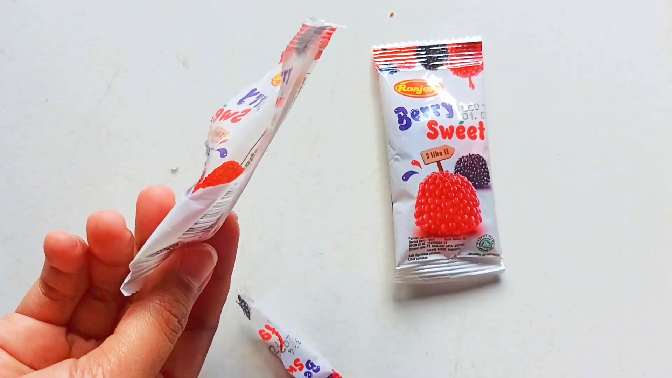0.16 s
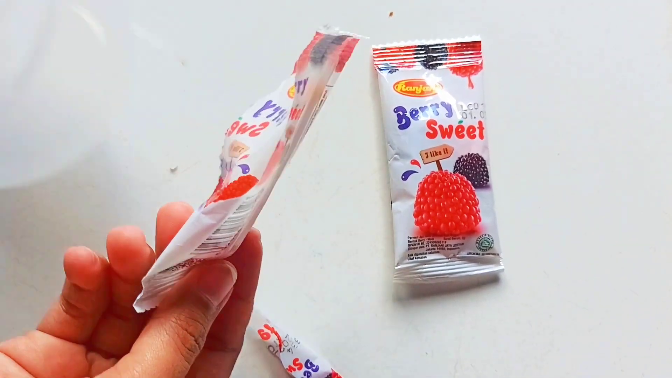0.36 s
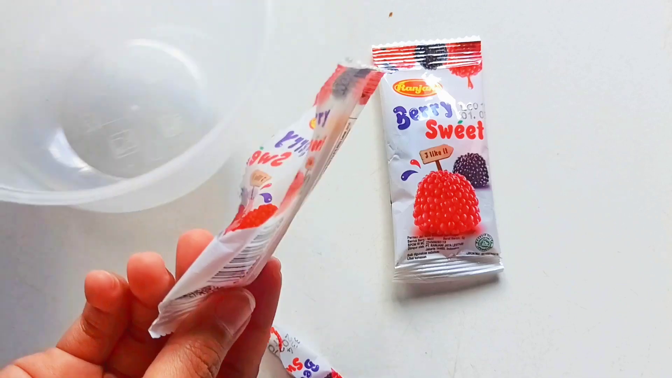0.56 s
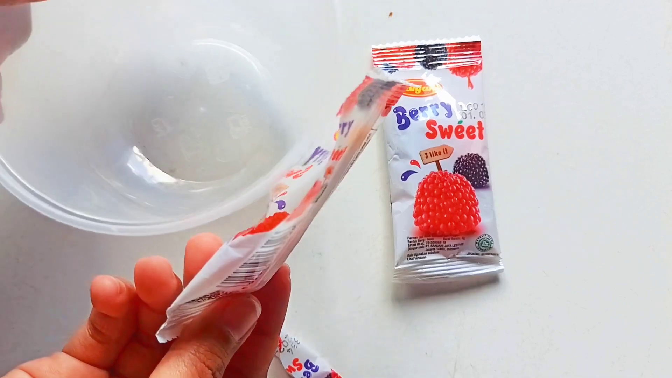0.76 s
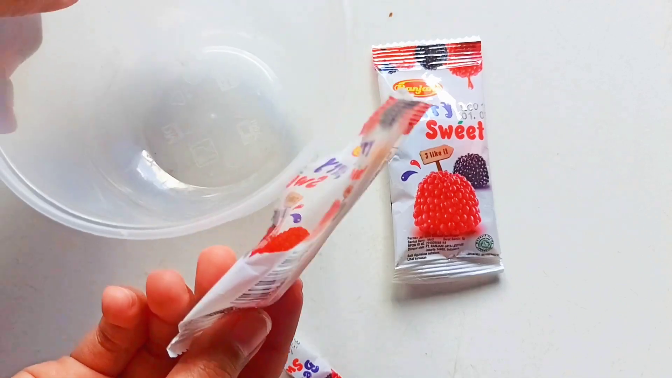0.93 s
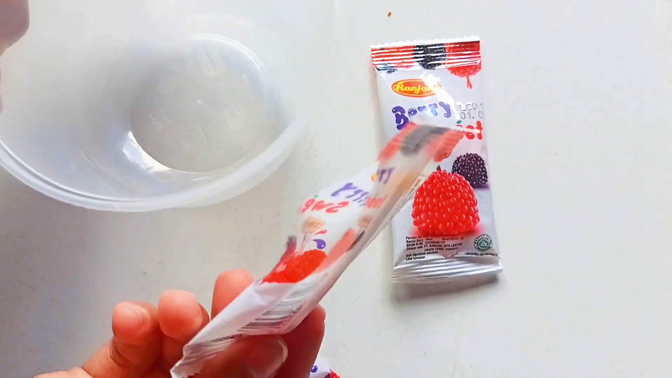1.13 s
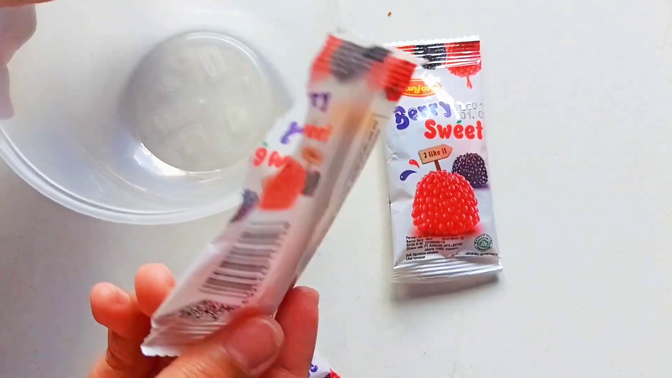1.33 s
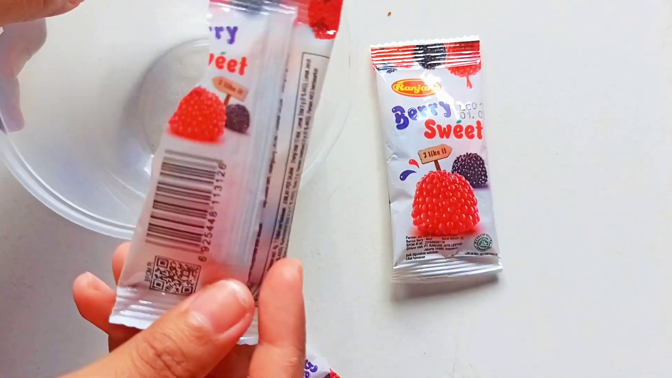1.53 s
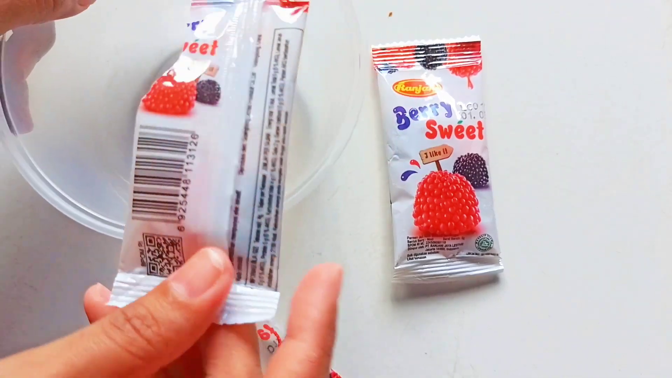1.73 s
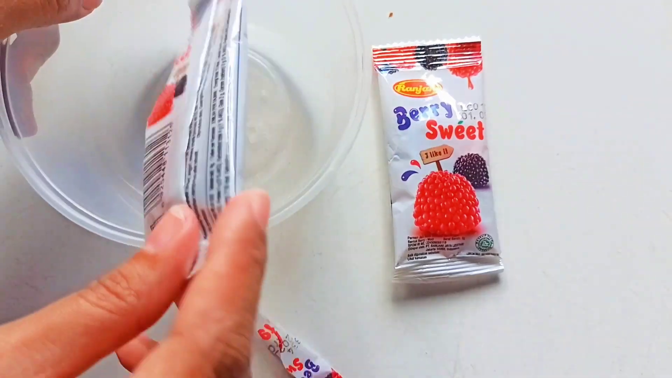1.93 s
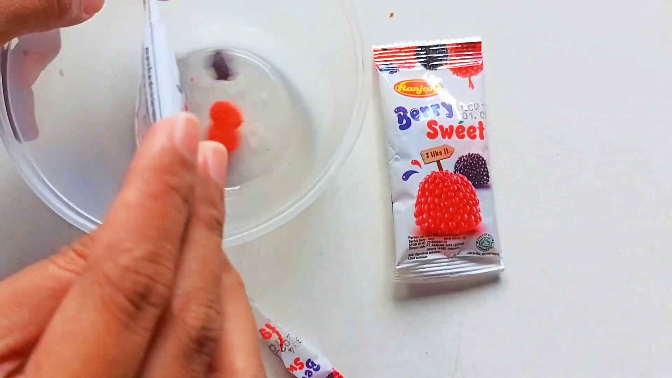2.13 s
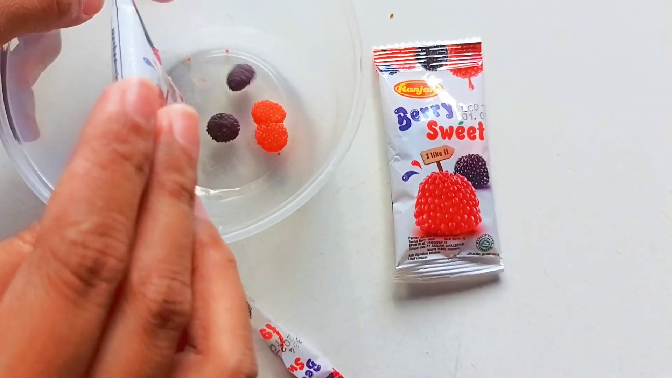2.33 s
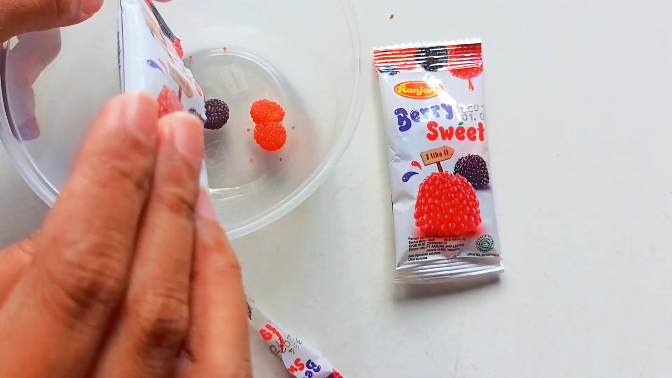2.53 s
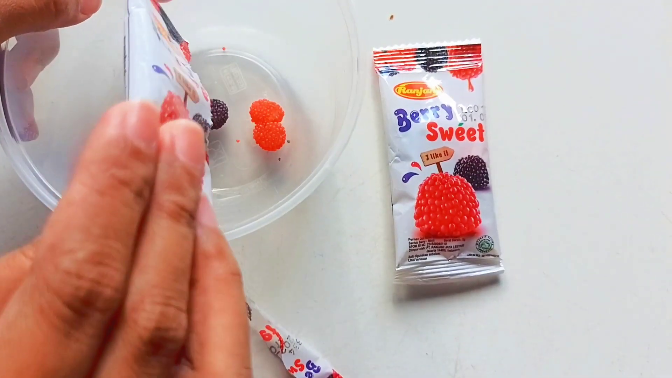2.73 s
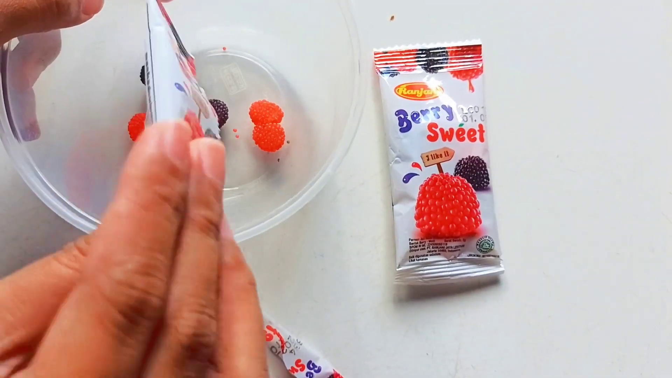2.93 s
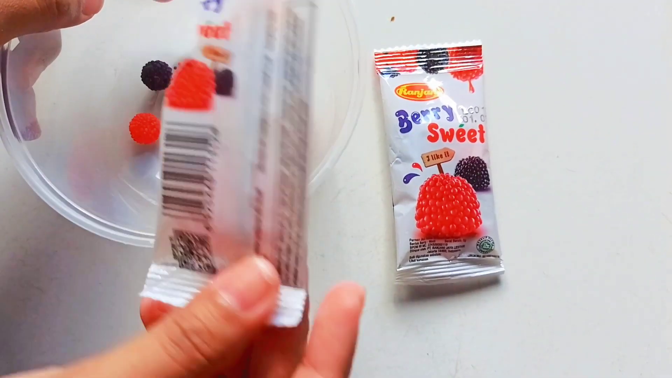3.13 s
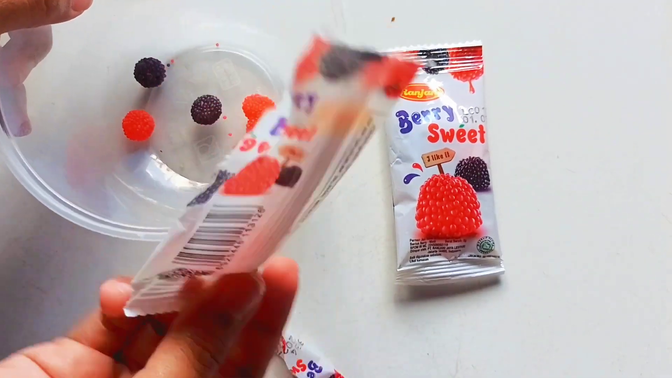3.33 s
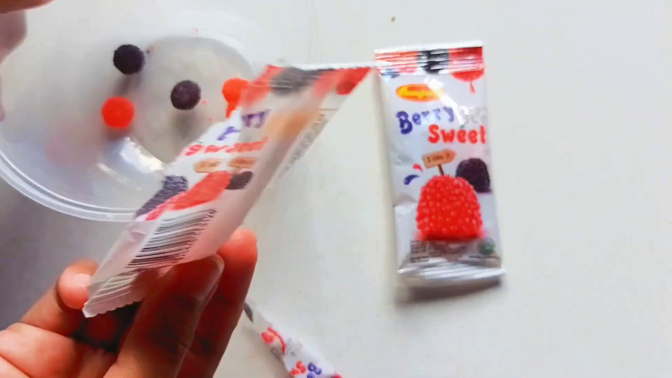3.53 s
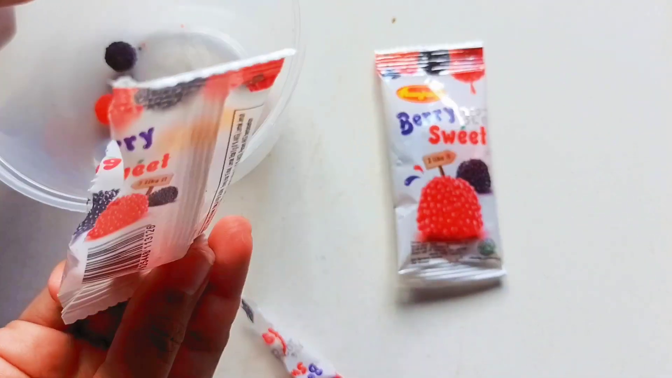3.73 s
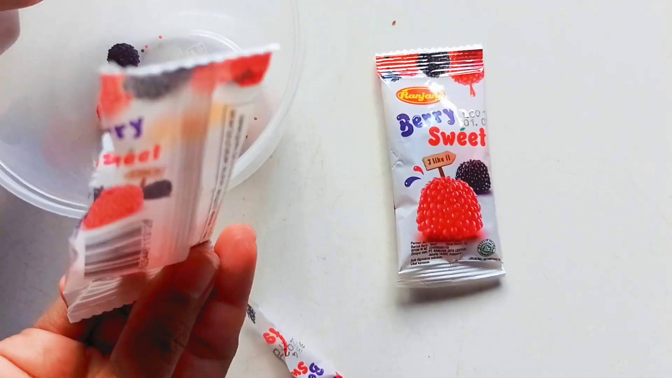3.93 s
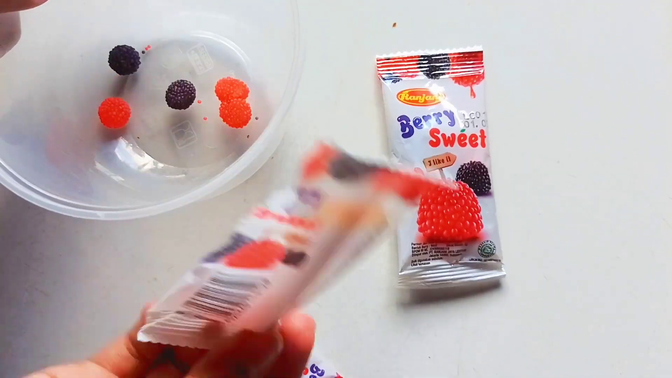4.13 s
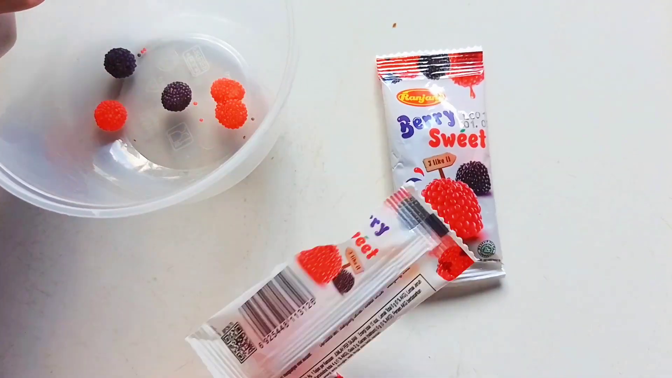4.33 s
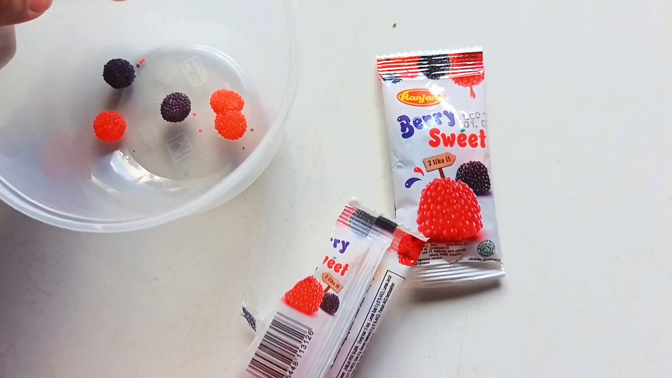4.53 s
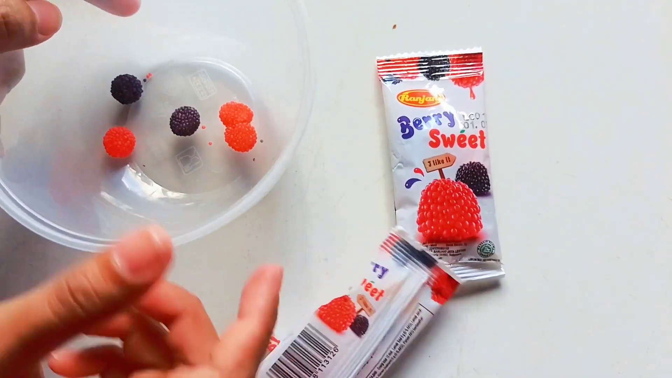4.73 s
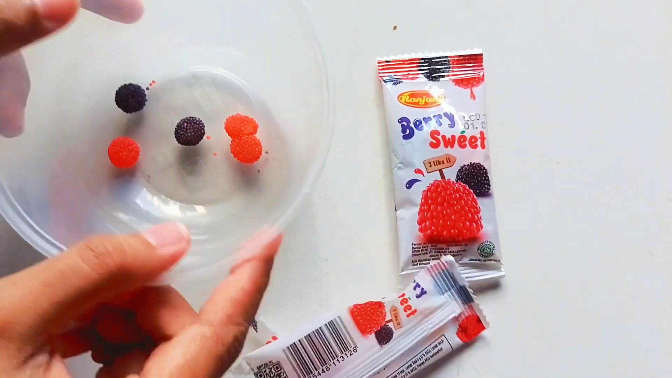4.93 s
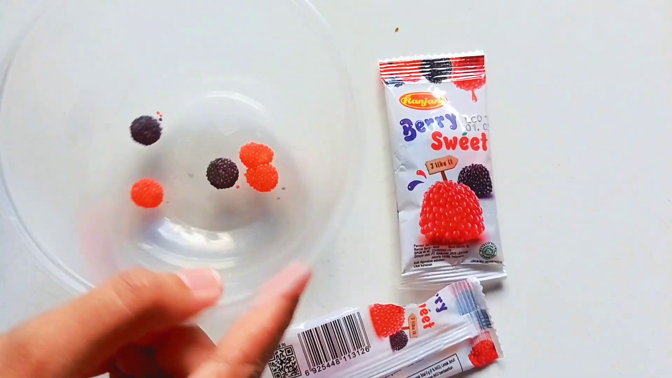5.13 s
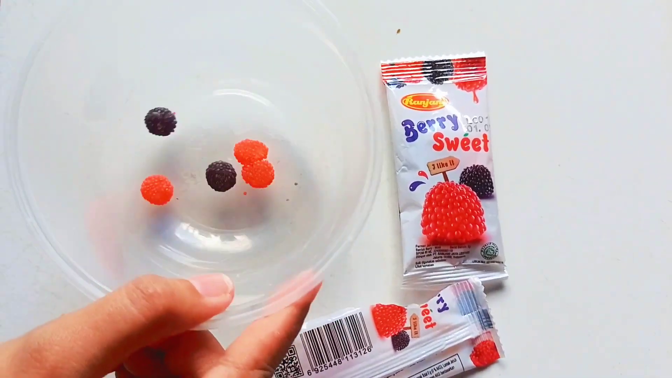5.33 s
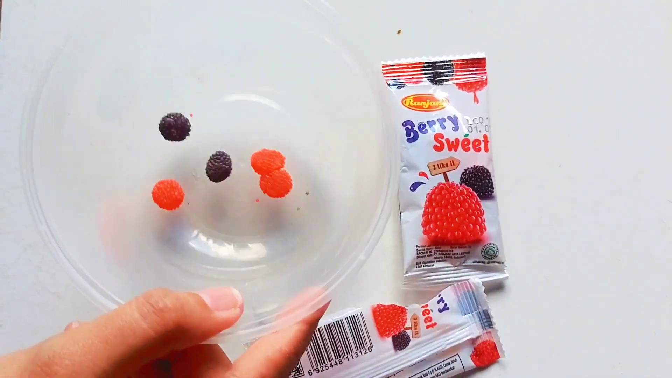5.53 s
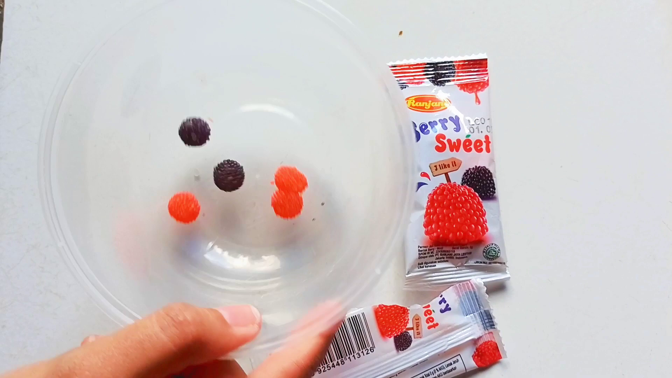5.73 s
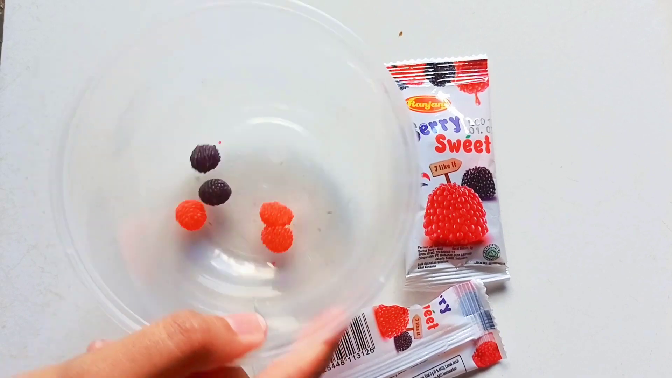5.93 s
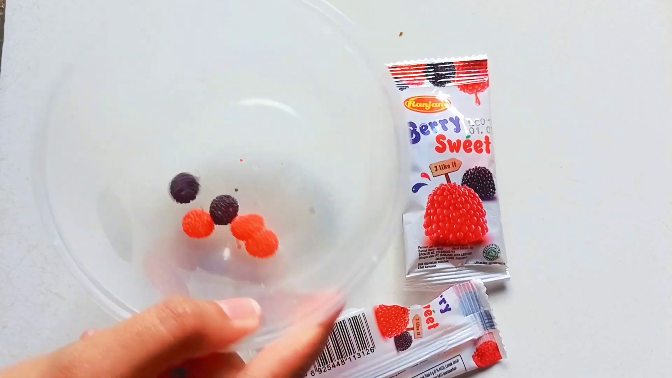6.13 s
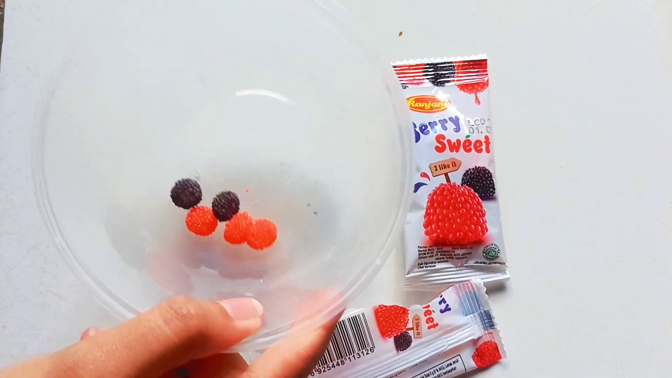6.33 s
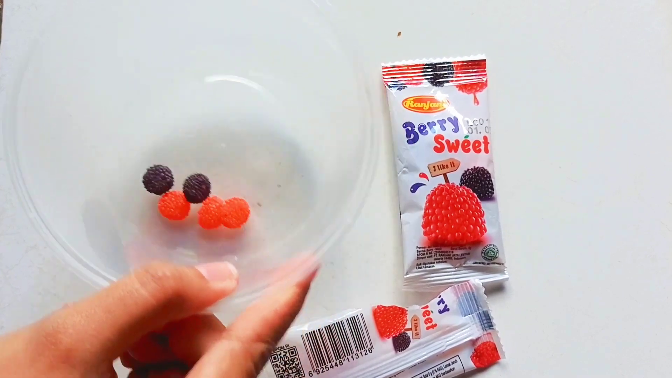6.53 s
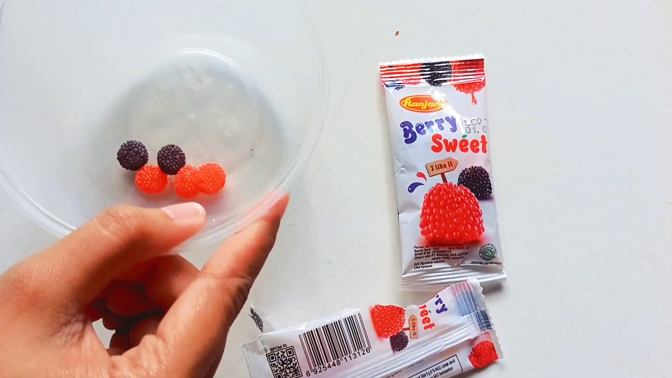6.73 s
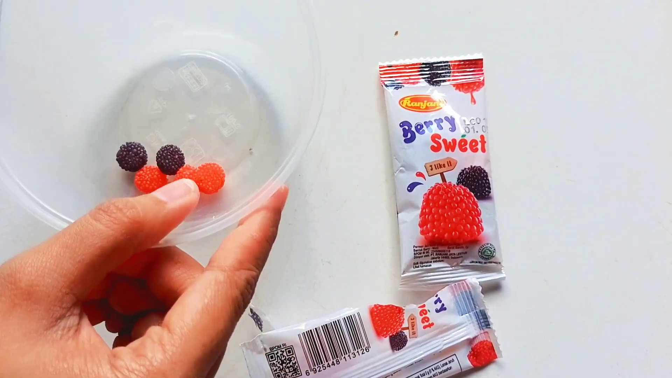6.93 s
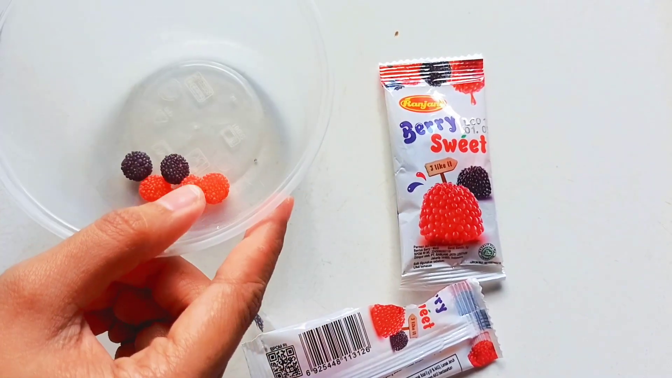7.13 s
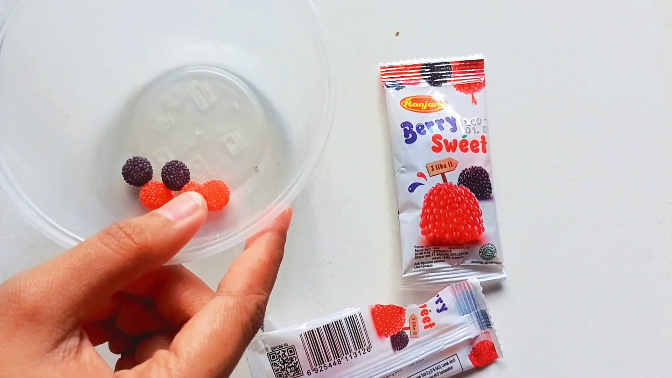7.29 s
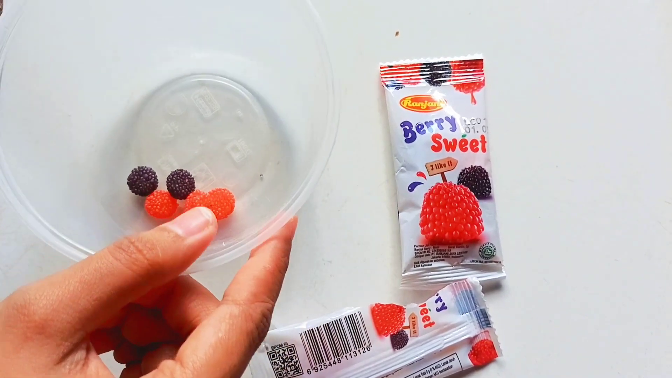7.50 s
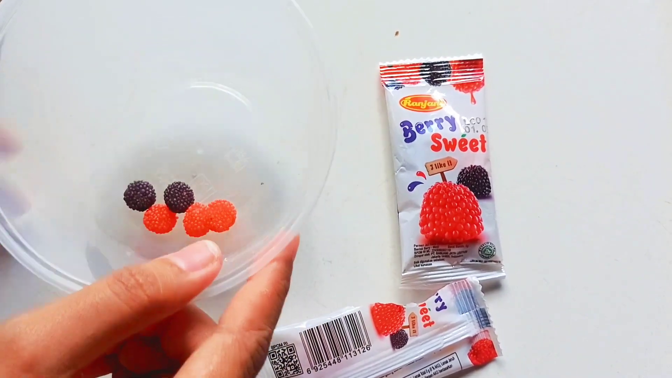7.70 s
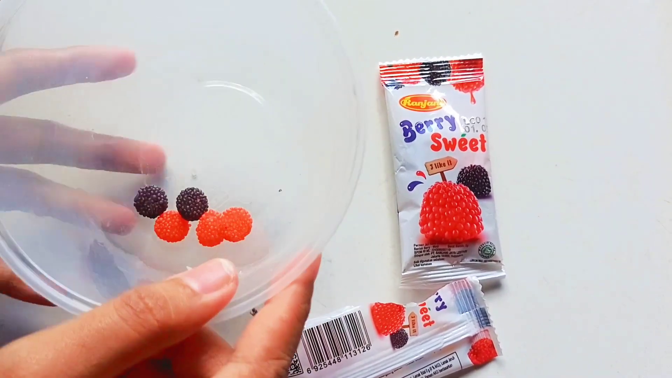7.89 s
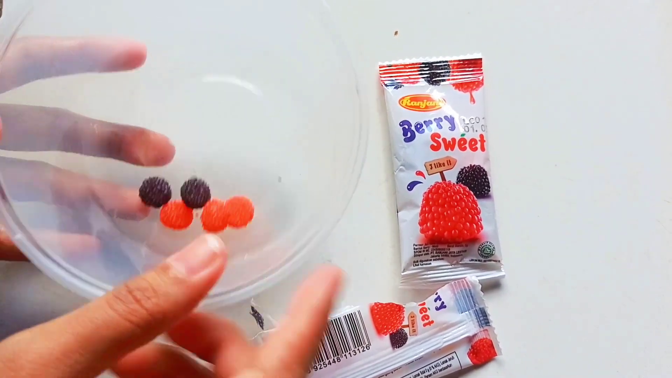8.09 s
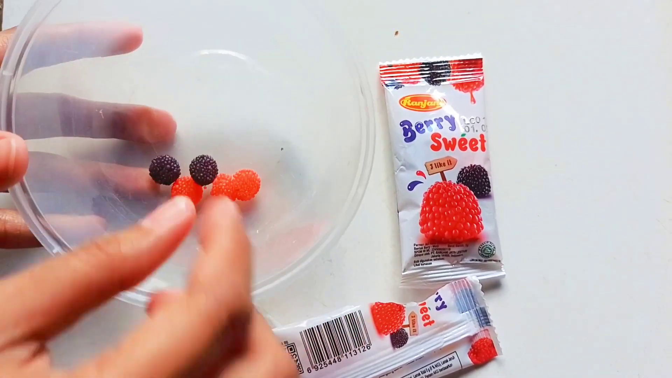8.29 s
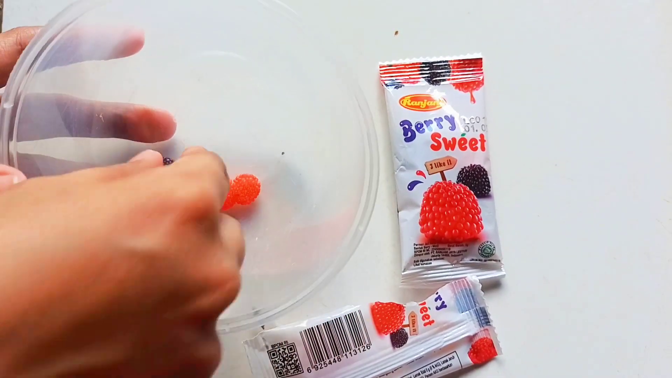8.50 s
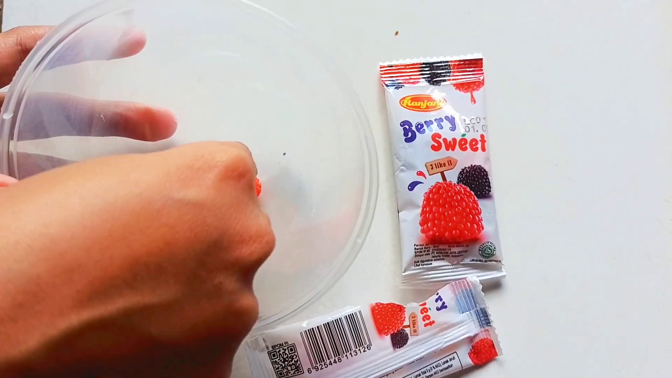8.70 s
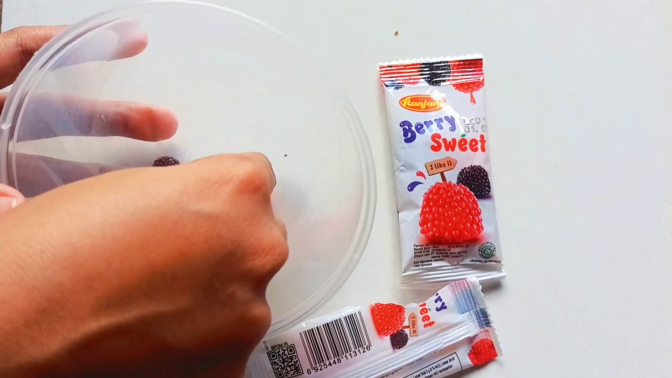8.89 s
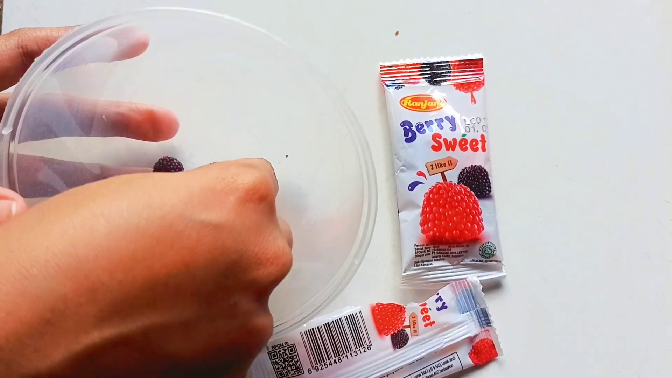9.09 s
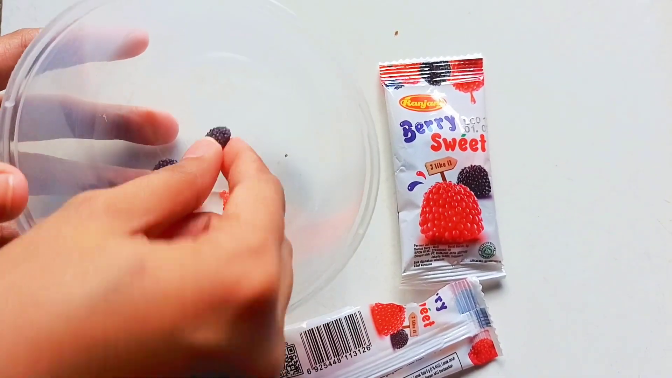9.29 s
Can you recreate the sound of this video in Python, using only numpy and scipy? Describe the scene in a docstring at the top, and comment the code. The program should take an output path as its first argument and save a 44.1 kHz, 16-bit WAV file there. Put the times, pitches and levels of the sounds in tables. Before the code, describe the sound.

Crisp wrapper clicks, a quick rattling pour of small sugared candies into a plastic bowl, faint crinkles, then a bumpy rolling and soft finger rustles.

```python
"""A thin plastic sachet crinkles in a hand: creases snap as coloured clicks.
From 2.1 s sugar-beaded gummy sweets pour into a light plastic bowl: knocks, patter and modal ring; they settle.
The sachet ticks faintly and is put down; from 4.9 s the bowl is tilted and the sweets roll on its side.
From 6.6 s fingers brush the rim: stick-slip noise and a few knocks; a dull swell and a lower hum pass.
Throughout: a small room's noise tail, hiss, low rumble and wavering hum."""
import sys
import numpy as np
from scipy import signal
from scipy.fft import rfft, irfft, next_fast_len
from scipy.io import wavfile
from scipy.ndimage import map_coordinates

SR = 44100
rng = np.random.default_rng(int(sys.argv[2]) if len(sys.argv) > 2 else 0)


def inscribe(sig):
    """Save sig as 16-bit PCM at rate SR to the path in sys.argv[1].

    A 1-D sig is mono; a 2-D sig holds one channel per row.
    Samples are clipped to [-1, 1] before scaling.
    """
    pcm = np.round(np.clip(np.atleast_2d(sig).T, -1, 1) * 32767)
    wavfile.write(sys.argv[1], SR, pcm.astype(np.int16))


N = 412335

# All levels are before the mix gains; spectra give shape only.
# Crease snaps: t/s, crack level/dB, body re crack/dB, treble re crack/dB, spot f/Hz
SNAPS = [(0.0472, -53, -31, 5, 4620), (0.0632, -44.5, -26, -2, 4830), (0.0804, -44.5, -7.5, -1.5, 2630),
         (0.7837, -48.5, -13, -6, 3730), (1.0448, -76, -2, 23, 3920), (1.0626, -53, -1, -1.5, 3330),
         (1.1053, -58, -3.5, 3, 3610), (1.1292, -40.5, -7.5, 2.5, 3700), (1.2884, -34.5, -8, -4.5, 4430),
         (1.3507, -57, -18, 6, 3810), (1.646, -44, -18, -6, 4200), (1.7634, -54, -21.5, 4.5, 3830),
         (1.9552, -41, -14, 5, 5300), (2.0218, -41, -7.5, 6, 4670), (2.9232, -43, -9, -2, 4190),
         (3.0348, -55, -28, -8, 3180), (3.1951, -56, -22, 3, 3780), (3.316, -57, -22.5, -3, 3040),
         (3.3983, -59, -21.5, 1.0, 4410), (3.4291, -53.5, -13, -4, 2970), (3.455, -48.5, -9, -10, 3930),
         (3.4737, -55.5, -5, -6, 4630), (3.6039, -53.5, -18, 12, 3780), (3.7261, -59, -13, 5, 4090),
         (3.8276, -60, -14, 1, 3900), (4.2085, -41.5, -14, -6, 3680), (4.2516, -66, -8, 9, 3100),
         (4.5009, -42, -11, -7.0, 3200), (4.5698, -44.5, -12.5, -11, 3830)]
# Spells of faint ticks: start t/s, end t/s, crack level/dB
HANDLING = [(2.944, 3.2, -58.5), (3.203, 3.46, -61), (3.478, 3.776, -57.5)]
# Crack spectrum of film and bowl side: f/Hz, level/dB
CREASE = [(400, -9.5), (1100, -27), (1800, -7), (2600, 0), (3500, 0.5), (4500, 0.5), (5800, 5.5),
          (8000, -18.5), (16000, -49)]
# Body spectrum of the flexing film: f/Hz, level/dB
FLEX = [(30, -17), (90, -31), (200, 8), (400, 0), (650, 1.5), (1000, -1.5), (1700, -6), (2500, -17),
        (5000, -61)]


def sachet():
    """Creases of the film buckle one at a time; handling sets off faint, shorter ones."""
    snaps = np.c_[SNAPS, np.full(len(SNAPS), 6)]  # spot peak, dB
    body, bright = clicks(snaps, CREASE, FLEX, t60=0.015, treble_t60=0.0094, body_t60=0.024,
                          spot_octaves=0.12)
    faint = np.vstack([scattered(start, end, db, body_db=-23, treble_db=1, scatter_db=2.5, count=9)
                       for start, end, db in HANDLING])
    tick_body, tick_bright = clicks(faint, CREASE, FLEX, t60=0.0075, treble_t60=0.0022, body_t60=0.012,
                                    spot_octaves=0.19)
    return amp(-4.0) * body + amp(-5.5) * bright + amp(-5.5) * (tick_body + tick_bright)


TILT_S = 4.9  # from here the sweets run on the bowl's side
# Sweets and fingertips on the bowl: t/s, crack level/dB, body re crack/dB, treble re crack/dB,
# spot f/Hz, spot peak/dB
KNOCKS = [(2.0643, -42.5, -0.5, -9, 2490, 10), (2.114, -44, -5.5, 0, 2470, 7),
          (2.1557, -25.5, -8.5, 0.5, 4150, 9.5), (2.173, -46, -6, 11, 7800, 8),
          (2.1872, -28.5, 2.5, 1, 4400, 9), (2.2152, -33.5, 1, -2, 4360, 2),
          (2.2286, -29.5, -5, 4, 3120, 9), (2.2499, -28, -1, -1.5, 3640, 8),
          (2.2938, -27, -5, -13, 4500, 14), (2.3063, -38, 0, 1, 3210, 3), (2.338, -34.5, 6, 4, 4600, 5),
          (2.3502, -28, -7.5, -9, 4540, 19), (2.3796, -40.5, -9, -2, 4350, 1),
          (2.3878, -43.5, -8, 2, 4430, 3), (2.4137, -38.5, -12, 7.5, 6470, 7),
          (2.4703, -42.5, -2, 1, 3680, 8), (2.4974, -45, -6, -18.5, 3900, 16),
          (2.5128, -42.5, -5, -7, 3715, 5), (2.6314, -39, 2, -2.5, 4700, 5),
          (2.6689, -35, -7.5, -2.5, 4300, 1), (2.74, -38.5, -4.5, 0.5, 4500, -7),
          (2.7541, -46, -9, -12, 3810, 5), (2.7688, -46, -7, -2, 3650, 3), (4.9406, -51, 5.5, -1, 3730, 8),
          (5.1143, -48.5, -1, 0.5, 6020, 15), (5.1613, -46, 0, -6, 3200, 9),
          (5.3351, -46, -2, -12, 3460, 10), (5.3583, -41.5, -2, -1, 4620, 10),
          (5.5292, -47, 7, -5, 2770, 10), (5.6875, -44.5, 4.5, -1, 4390, -4),
          (5.7607, -52, 3, -3, 2210, 19), (5.9091, -44, 2, -5, 4620, 14), (6.0225, -28, -1.5, -6, 2450, 15),
          (6.039, -39.5, 2.5, -10, 4040, 6), (6.083, -42, -12, -3, 4900, 7), (6.1115, -43, 4, -7, 2380, 8),
          (6.1615, -43.5, 13.5, 1.5, 5580, 6), (6.1954, -36.5, 5, -5, 2500, 16),
          (6.2131, -40.5, 3.5, -2, 2570, 9), (6.2268, -39, 1, -3, 4920, 9), (6.2415, -43, 4, -1, 2520, 5),
          (6.2621, -41.5, 9, 4.5, 6770, 7), (6.3061, -39.5, 1, -5, 4730, 10), (6.352, -41, 5, 1, 2650, 13),
          (6.3952, -41, 0, -3, 2480, 10), (6.4731, -39, 0.5, -6, 2450, 7), (6.529, -53, 1.5, 5.5, 7290, 5),
          (6.6822, -48.5, 1.5, 1, 3380, 3), (6.697, -45.5, -4, -2, 3100, 7),
          (6.796, -50.5, -18, 3, 4700, 10), (7.449, -48, -21.5, 4, 4520, 17),
          (8.2345, -55.5, -12, -0.5, 3370, 10), (8.852, -52.5, -19, -1, 4100, 11),
          (9.09, -54.5, 0, 2.5, 4220, 5)]
# Crack spectrum on the base: f/Hz, level/dB
CRACK = [(400, -24), (1300, -13), (1900, -7), (2800, 1), (4400, 3), (5800, 6.5), (8000, -33), (16000, -44)]
# Drumming spectrum of the base: f/Hz, level/dB
BASE = [(30, -30), (150, -8), (300, -4.5), (450, -1), (600, -4.5), (780, 1.5), (950, -5), (1280, -3.5),
        (1550, -6), (2200, -31), (5000, -18)]
# Drumming spectrum of the side: f/Hz, level/dB
SIDE = [(40, -26), (250, -6.5), (360, 3), (520, -1), (780, 2.5), (1000, 0.5), (1150, -9), (1300, -3.5),
        (1480, -7), (1850, -17), (2450, -8), (3000, -17), (5000, -50)]


def knocks(motion):
    """Hard sugar coats click and drum on the base, then on the tilted side; gives drumming and clicks."""
    rows = np.vstack([KNOCKS, bumps(motion)])
    tilted = rows[:, 0] > TILT_S
    base, base_click = clicks(rows[~tilted], CRACK, BASE, t60=0.015, treble_t60=0.011, body_t60=0.018,
                              spot_octaves=0.08)
    side, side_click = clicks(rows[tilted], CREASE, SIDE, t60=0.018, treble_t60=0.011, body_t60=0.014,
                              spot_octaves=0.086)
    drumming = amp(-6.0) * base + amp(-9.0) * side
    clicking = amp(-4.5) * base_click + amp(-6) * side_click
    return drumming, clicking


POUR_S, POUR_RISE_S, POUR_HOLD_S, POUR_DB = 2.16, 0.084, 0.043, -38.5
SETTLE_DB_PER_S = 30.5
REST_S, STOP_S = 2.73, 0.067  # the stop starts POUR_RISE_S after REST_S, losing 20 dB per STOP_S
JERK_DB, JERKS_PER_S = 2.5, 28
STIR_DB, STIR_FADE_S = -12.5, 0.05  # re the knock; time to lose 20 dB
# Rolling as the bowl is rocked: t/s, level/dB
ROLL = [(4.98, -64), (5.06, -57), (5.16, -50), (5.3, -56), (5.36, -45), (5.42, -49), (5.48, -55.5),
        (5.6, -57.5), (5.75, -54), (5.92, -45.5), (6.06, -46.5), (6.17, -50.5), (6.23, -46), (6.41, -47),
        (6.599, -86)]


def sweets_motion():
    """Sweets pour, settle and later roll, in fits and starts; every knock stirs them briefly."""
    stopping = envelope(0, POUR_RISE_S, STOP_S, hold=REST_S)
    settling = envelope(POUR_S, POUR_RISE_S, 20 / SETTLE_DB_PER_S, hold=POUR_HOLD_S)
    pour = amp(POUR_DB) * settling * stopping
    roll = amp(curves(ROLL, outside=-120)[0])
    jerks = amp(JERK_DB * wobble(JERKS_PER_S))
    stirred_power = np.zeros(N)
    rocking = envelope(0, 0.002, STIR_FADE_S)[:SR // 2]
    for s, db, *_ in KNOCKS:
        add(stirred_power, s, (amp(db + STIR_DB) * rocking) ** 2)
    return np.sqrt((pour ** 2 + roll ** 2) * jerks ** 2 + stirred_power)


def bumps(motion):
    """Moving sweets collide, the harder the faster they go."""
    kind = dict(db=-2, body_db=-3, treble_db=-4, scatter_db=1)  # db re motion
    poured = scattered(POUR_S, REST_S, **kind, count=16)
    rolled = scattered(ROLL[0][0], ROLL[-1][0], **kind, count=50)
    rows = np.vstack([poured, rolled])
    rows[:, 1] += 20 * np.log10(motion[(rows[:, 0] * SR).astype(int)])
    return rows


# Scratch spectrum of sugar on plastic: f/Hz, level/dB
SUGAR = [(300, -38), (1300, -16), (1850, -12.5), (2350, -3), (3000, -3.5), (4500, 1), (7000, 2.5),
         (12000, -13), (16000, -19)]


def rolling(motion, surface, drum_rate, drum_db, scratch_rate, spread_db, scratch_db):
    """Sugar beads drum softly on the plastic, sharper ones scratch it; gives drumming and scratches."""
    drum = through(patter(drum_rate, spread_db=4.5, t60=0.012), colour(surface))
    scratch = through(patter(scratch_rate, spread_db, t60=0.006), colour(SUGAR))
    return motion * amp(drum_db) * unit(drum), motion * amp(scratch_db) * unit(scratch)


WALL_DB, WALL_OCTAVES = 10.5, 0.3  # peak height, half width
WALL_WANDER_OCTAVES, WALL_HOPS_PER_S = 0.18, 70
# Touched place, low in the soft middle, high near the stiff side: t/s, mean resonance f/Hz
WALL = [(2.15, 840), (2.35, 856), (2.56, 720), (4.95, 670), (5.3, 836), (5.6, 901), (5.8, 866), (6.0, 1000),
        (6.2, 1250), (6.4, 1110), (6.55, 1110), (8.1, 1010), (8.9, 810)]


def wall(x):
    """The wall stresses the pitch of the place touched, which wanders fast; crossfaded resonances."""
    centres_hz = np.geomspace(560, 1400, num=7)
    touched_hz = curves(WALL)[0] * 2 ** (WALL_WANDER_OCTAVES * wobble(WALL_HOPS_PER_S))
    place = np.interp(touched_hz, centres_hz, np.arange(len(centres_hz)))
    out = np.zeros(N)
    for k, centre_hz in enumerate(centres_hz):
        share = np.clip(1 - abs(place - k), 0, 1)
        resonance = causal(lambda hz: peak(hz, centre_hz, WALL_DB, WALL_OCTAVES) - WALL_DB / 2)
        out += through(x * share, resonance)
    return out


# Modes of the thin bowl: f/Hz, relative level/dB, free t60/s
BOWL = [(361, -11, .12), (446, -11, .12), (545, -10, .13), (617, -8, .16), (690, -8, .16), (750, -2.5, .26),
        (814, -3, .22), (865, -8, .12), (956, -8, .11), (1040, -5, .14), (1280, -2.5, .15), (1540, -14, .1)]


def bowl_ring(decay=1):
    """Decaying bowl modes as an impulse response of energy 1; a hand shortens t60 by the factor decay."""
    t = np.arange(SR // 3) / SR
    ring = np.zeros(len(t))
    for k, (hz, db, t60) in enumerate(BOWL):
        ring += (-1) ** k * amp(db - 60 * t / (t60 * decay)) * np.sin(2 * np.pi * hz * t)
    return ring / np.linalg.norm(ring)


STROKE_RISE_S, STROKE_FADE_S = 0.01, 0.027  # fade: time to lose 20 dB
# Plastic sliding under fingers: start t/s, hold t/s, level/dB, dull rub re level/dB
STROKES = [(0.032, 0.081, -56.5, -6), (1.342, 0.1, -62.5, -12), (1.505, 0.067, -60, -11),
           (3.124, 0.018, -50.5, -7), (3.597, 0.0061, -54.5, -2), (4.503, 0.015, -59, -4),
           (4.935, 0.015, -57, 2), (6.679, 0.027, -55.5, -4.5), (6.757, 0.038, -63, -14),
           (7.037, 0.046, -54, -9), (7.137, 0.012, -56.5, -21), (7.322, 0.002, -58, -15),
           (7.372, 0.097, -61, -24), (7.536, 0.046, -62, -8), (8.085, 0.012, -59.5, 5.5),
           (8.879, 0.054, -55.5, -0.5), (9.01, .004, -64, 6)]
# Rustle spectrum: f/Hz, level/dB
FILM = [(200, -23), (1000, -10), (2000, -13), (3800, 0), (7000, 1.5), (12000, -14), (16000, -23)]


def rustle():
    """Sliding plastic sticks and slips in a crowd of minute ticks; gives the wall's dull rub and the rustle."""
    pressed, sliding = np.zeros(N), np.zeros(N)
    for s, hold, db, rub_db in STROKES:
        level = amp(db) * envelope(s, STROKE_RISE_S, STROKE_FADE_S, hold=hold)
        sliding += level
        pressed += level * amp(rub_db)
    ticks = patter(rate=550, spread_db=7.0, t60=0.02) + amp(-10.0) * rng.standard_normal(N)
    return pressed * noise(SIDE), amp(7.5) * sliding * unit(through(ticks, colour(FILM)))


# Treble spectrum of every click: f/Hz, level/dB
TREBLE = [(2000, -53), (5000, -7), (6400, 12), (7200, 7), (8000, 8.5), (12000, -6.5), (16000, -11)]
STRIKE_S, STRIKE_DB = 0.0012, -4  # spike delay; level re the shiver


def clicks(rows, crack, body, t60, treble_t60, body_t60, spot_octaves, size=2048):
    """Click = spike + fast-dying noise shiver, stressed at the spot's pitch; gives body and bright tracks."""
    t = np.arange(size) / SR
    low, mid, high = colour(body)[:size], colour(crack)[:size], colour(TREBLE)[:size]
    spike = amp(STRIKE_DB) * unit(np.sinc((t - STRIKE_S) * SR))
    onset = (1 - np.exp(-t / 0.00055)) ** 2
    afterring = amp(-25 - 60 * t / 0.035)

    def burst(life):
        """One spike and its shiver, with t60 = life."""
        return spike + unit(rng.standard_normal(size) * onset * (amp(-60 * t / life) + afterring))

    dull, bright = np.zeros(N), np.zeros(N)
    for s, db, body_db, treble_db, spot_hz, ring_db in rows:
        spot = causal(lambda hz: peak(hz, spot_hz, ring_db, spot_octaves), size=1024)
        snap = unit(through(through(burst(t60), spot), mid))
        sparkle = amp(treble_db) * unit(through(burst(treble_t60), high))
        add(dull, s, amp(db + body_db) * unit(through(burst(body_t60), low)))
        add(bright, s, amp(db) * (snap + sparkle))
    return dull, bright


# Range of small-click pitches: low f/Hz, high f/Hz
SPOT_RANGE_HZ = (2730, 5170)


def scattered(start, end, db, body_db, treble_db, scatter_db, count):
    """Rows of small clicks at uneven moments, each with its own strength, colour and pitch."""
    s = start + (end - start) * (np.arange(count) + rng.random(count)) / count
    scatter = scatter_db * np.clip(rng.standard_normal((count, 3)), -1.5, 1.5)
    levels = [db, body_db, treble_db] + scatter
    spot_hz = rng.uniform(*SPOT_RANGE_HZ, count)
    return np.c_[s, levels, spot_hz, np.full(count, 6)]  # spot peak, dB


def patter(rate, spread_db, t60):
    """Tiny contacts at random moments, of uneven sizes, each a short noise burst; rms 1."""
    sizes = amp(spread_db * np.clip(rng.standard_normal(N), -2, 2))
    contacts = (rng.random(N) < rate / SR) * sizes
    fade = amp(-60 * np.arange(SR // 40) / SR / t60)
    power = np.abs(through(contacts ** 2, fade ** 2))
    return unit(np.sqrt(power) * rng.standard_normal(N))


# Decay of the room: f/Hz, t60/s
ROOM = [(200, 0.75), (1000, 0.49), (4000, 0.45), (14000, 0.23)]


def room(x):
    """Diffuse tail, treble dying first; redrawn every 0.25 s as the hands move."""
    out, hop = np.zeros(N), SR // 4
    for start in range(0, N, hop):
        hz, t, z = signal.stft(rng.standard_normal(SR // 2), SR, nperseg=256)
        decay = amp(-60 * t / along(ROOM, hz)[:, None])
        tail = signal.istft(z * decay, SR, nperseg=256)[1]
        tail /= np.linalg.norm(tail)
        add(out, start / SR + 0.005, signal.fftconvolve(x[start:start + hop], tail))
    return out


HUM_HZ = 122.6
# Wavering hum: t/s, level/dB
HUM = [(0, -64.5), (0.95, -53.5), (1.45, -60.5), (1.8, -54), (2.3, -69), (3.5, -58.5), (4.3, -68),
       (5.05, -54.5), (5.7, -68), (7.5, -58), (8.2, -76), (9.35, -58)]
# Rumble: t/s, level/dB before a 2 dB lift
RUMBLE = [(0.0, -54.5), (0.21, -57), (3.49, -56), (6.2, -53), (9.35, -54.5)]
# Rumble spectrum: f/Hz, level/dB
LOW = [(20, -50), (48, -37), (60, -29), (76, -5.5), (92, -7), (120, 0), (180, 1), (250, -7), (320, -16),
       (700, -18), (1300, -34.5), (3000, -57)]
# Dull swell spectrum: f/Hz, level/dB
SWELL = [(100, -43), (250, 17.5), (330, -3.5), (440, 11), (800, -14), (2000, -10.5), (5000, -50)]
# Hiss: t/s, level/dB
HISS = [(0, -63), (1, -63), (3.9, -61.5), (7.7, -59.5), (9.35, -59.5)]
# Hiss spectrum: f/Hz, level/dB
AIR = [(100, -2), (1000, 1), (2000, 0), (4200, 3), (7000, 3), (12000, -11), (16000, -9.5)]


def background():
    """Hiss, rumble and swell are filtered noise; hums are sines of wandering pitch, one passing."""
    hums = tone(HUM_HZ, curves(HUM)[0], waver_hz=2.55) + tone(78, db=-68.5, waver_hz=2.44)
    drone = envelope(7.83, rise=0.25, fade=0.23, hold=0.8) * tone(106.5, db=-53.5, waver_hz=1.22)
    rumble = amp(curves(RUMBLE)[0] + 2.0) * noise(LOW)
    surge = amp(-54.5) * envelope(7.3, rise=0.84, fade=0.65) * noise(SWELL)
    hiss = amp(curves(HISS)[0]) * noise(AIR)
    return hums + drone + rumble + surge + hiss


def tone(hz, db, waver_hz):
    """A sine whose pitch wanders slightly."""
    drift = map_coordinates(rng.standard_normal(80), [np.linspace(2, 77, N)])
    return np.sqrt(2) * amp(db) * np.sin(2 * np.pi * np.cumsum(hz + waver_hz * drift) / SR)


def noise(spectrum):
    """Steady coloured noise of rms 1."""
    return unit(through(rng.standard_normal(N), colour(spectrum)))


def envelope(start, rise, fade, hold=0):
    """Rises to 1, holds, then loses 20 dB in every fade time; cut after four."""
    t = np.arange(int((rise + hold + 4 * fade) * SR)) / SR
    out = np.zeros(N)
    add(out, start, np.clip(t / rise, 0, 1) * amp(-20 * np.maximum(t - rise - hold, 0) / fade))
    return out


def wobble(rate):
    """A smooth random curve, rate knots a second."""
    return map_coordinates(rng.standard_normal(200), [np.arange(N) * rate / SR], mode="mirror")


def peak(hz, centre_hz, height_db, octaves):
    """Gain in dB of one broad resonance."""
    return height_db / (1 + (np.log2((hz + 1) / centre_hz) / octaves) ** 2)


def amp(db):
    """Decibels to gain."""
    return 10 ** (np.asarray(db) / 20)


def unit(x):
    """Scaled to rms 1."""
    return x / np.sqrt(np.mean(x ** 2) + 1e-20)


def along(points, hz):
    """(Hz, value) points read on a log axis."""
    f, v = np.transpose(points)
    return np.interp(np.log(hz + 1), np.log(f + 1), v)


def curves(rows, outside=None):
    """One value per sample for each column after the time."""
    s, *cols = np.transpose(rows)
    return [np.interp(np.arange(N) / SR, s, c, left=outside, right=outside) for c in cols]


def causal(gain_db, size=4096):
    """Minimum-phase impulse response with this gain over frequency, by folding the cepstrum."""
    cepstrum = irfft(np.log(amp(gain_db(np.fft.rfftfreq(size, 1 / SR)))))
    cepstrum[1:size // 2] *= 2
    cepstrum[size // 2 + 1:] = 0
    return irfft(np.exp(rfft(cepstrum)))


def colour(spectrum):
    """Impulse response of energy 1 with the given spectrum."""
    response = causal(lambda hz: along(spectrum, hz))
    return response / np.linalg.norm(response)


def through(x, response):
    """x convolved with a response, at its own length."""
    return signal.oaconvolve(x, response)[:len(x)]


def add(track, s, sound):
    """Mix a sound in at time s."""
    part = track[max(round(s * SR), 0):][:len(sound)]
    part += sound[:len(part)]


def scene():
    """Sachet, sweets, bowl and fingers, their room, and the background."""
    motion = sweets_motion()
    tilted = np.arange(N) / SR > TILT_S
    settling = rolling(motion * ~tilted, BASE, drum_rate=720, drum_db=-3,
                       scratch_rate=510, spread_db=2.0, scratch_db=-5.0)
    tilting = rolling(motion * tilted, SIDE, drum_rate=600, drum_db=2.5,
                      scratch_rate=600, spread_db=3.5, scratch_db=1.5)
    drumming, clicking = np.sum([knocks(motion), rustle(), settling, tilting], axis=0)
    body = wall(drumming)
    free_ring = amp(-28) * through(body * ~tilted, bowl_ring())
    held_ring = amp(-26.5) * through(body * tilted, bowl_ring(decay=0.52))
    near = sachet() + clicking + body + free_ring + held_ring
    return (near + amp(-11.0) * room(near) + background())[None]


TOP_HZ = 15700
# Weak bands of the microphone: low edge f/Hz, high edge f/Hz, level/dB
DIPS = [(4780, 6120, -7.5), (7730, 8410, -5.5), (8532, 11590, -19.5)]


def record(dry):
    """The microphone has a few weak treble bands and a steep upper limit."""
    def dips_db(hz):
        """Sum of soft-edged bands."""
        return sum(db * (np.tanh((hz - lo) / 50) - np.tanh((hz - hi) / 50)) / 2 for lo, hi, db in DIPS)

    heard = through(dry[0], causal(dips_db))
    size = next_fast_len(N + SR)
    passed = np.fft.rfftfreq(size, 1 / SR) < TOP_HZ
    return irfft(rfft(heard, size) * passed, size)[None, :N]


dry = scene()
out = record(dry)
inscribe(out)
```